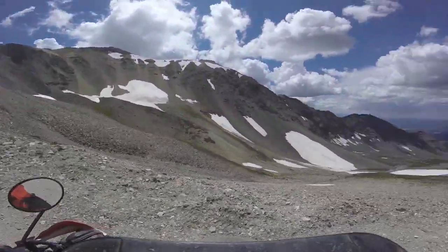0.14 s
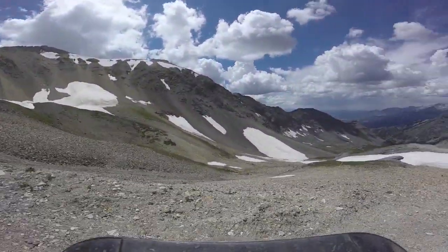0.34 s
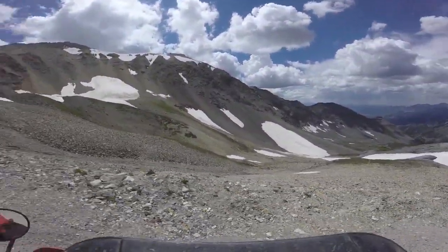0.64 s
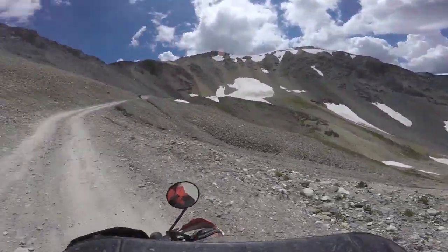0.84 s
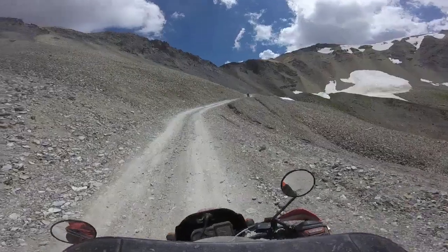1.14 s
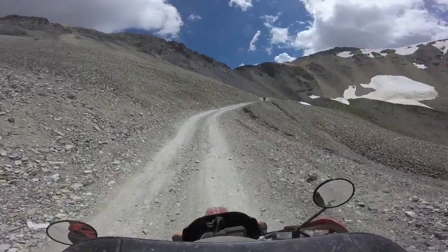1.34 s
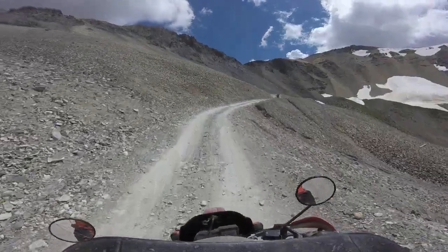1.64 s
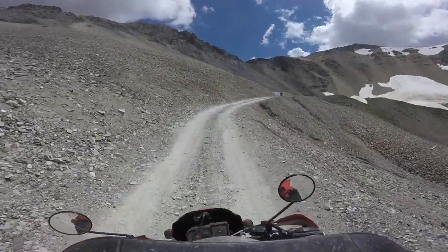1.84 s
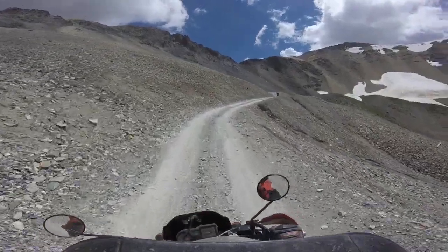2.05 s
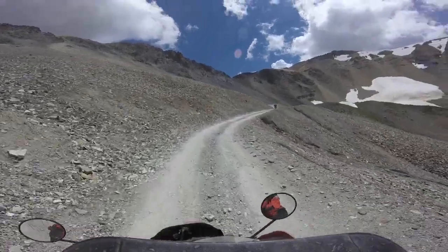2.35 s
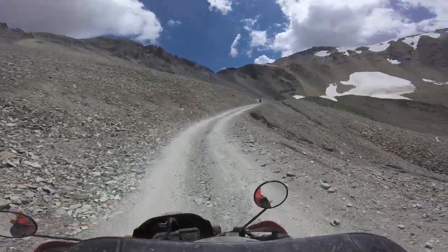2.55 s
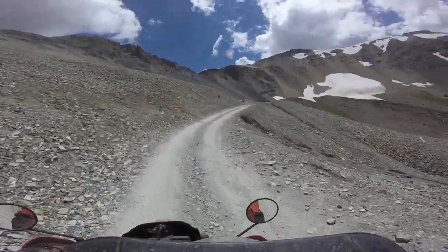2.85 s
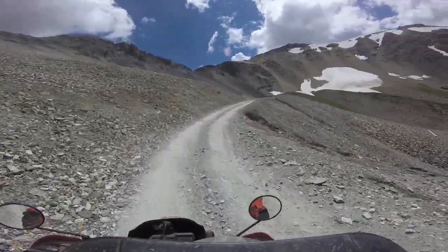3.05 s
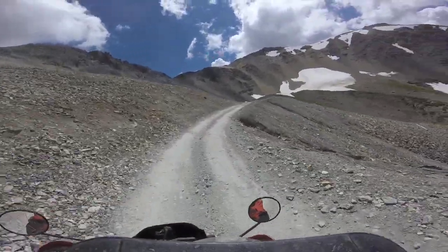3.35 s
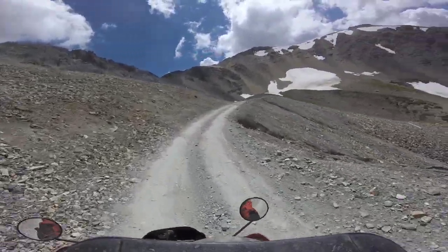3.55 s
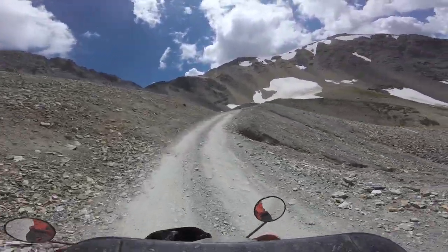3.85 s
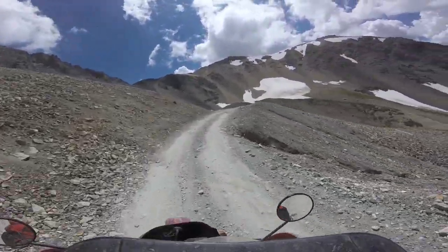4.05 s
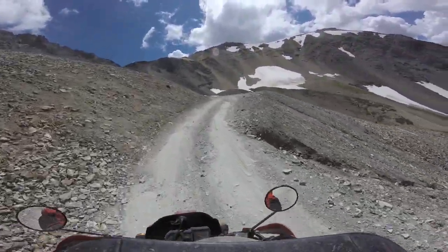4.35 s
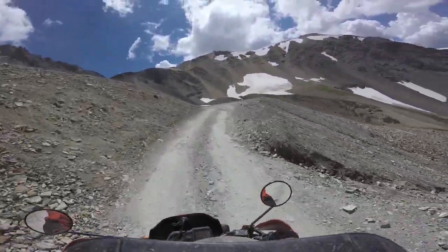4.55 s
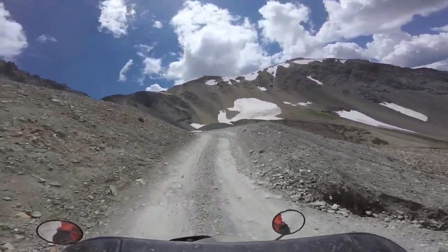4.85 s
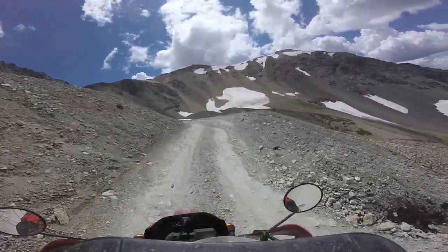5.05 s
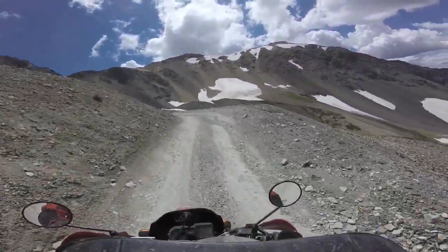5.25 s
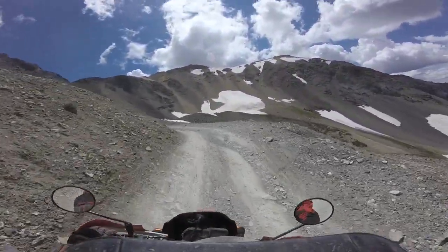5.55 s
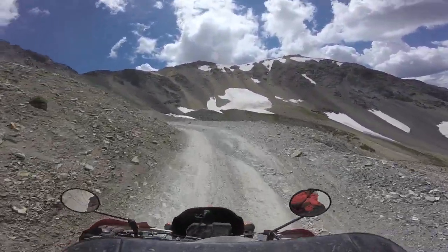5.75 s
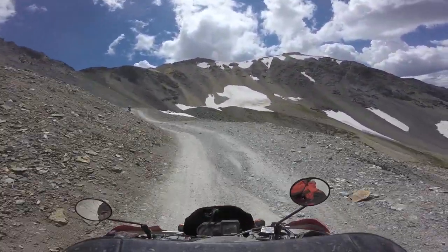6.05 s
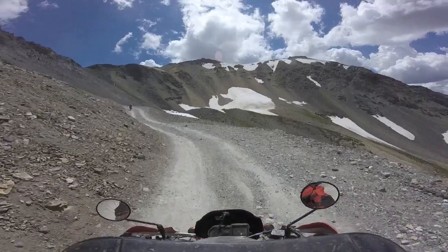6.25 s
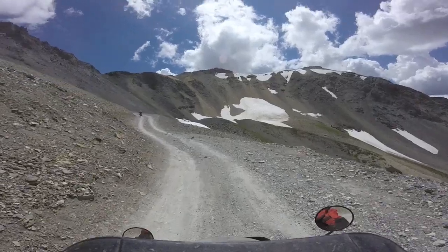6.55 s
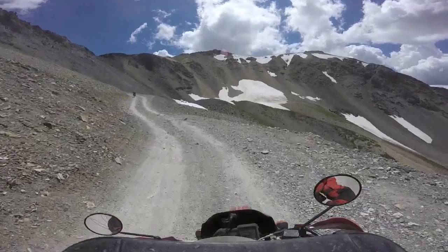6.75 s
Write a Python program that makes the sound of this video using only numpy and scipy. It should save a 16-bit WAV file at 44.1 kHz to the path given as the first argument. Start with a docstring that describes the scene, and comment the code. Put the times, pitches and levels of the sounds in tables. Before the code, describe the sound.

Wind rumbles over a thumping motorcycle engine on a gravel track; stones tick off the bike before the throttle shuts.

```python
"""A single-cylinder motorcycle climbs a gravel mountain track, heard from the rider's helmet. Stones clack at
once; each firing thumps the exhaust pipe, sets it barking and ends in a rasp of gas. Tyres crunch and wind
buffets the microphone throughout. The head, at first turned aside, faces ahead by 1 s. A stone ticks at 1.6 s.
The engine pulls hardest at 2.6 s; from 3.7 s stones tick, clack and skitter against the bike. Near 6 s the
throttle shuts and the tyres slide through loose gravel, up to a last clack."""
import sys
import numpy as np
from scipy import signal
from scipy.fft import rfft, irfft
from scipy.io import wavfile
from scipy.ndimage import uniform_filter1d

SR = 44100
rng = np.random.default_rng(int(sys.argv[2]) if len(sys.argv) > 2 else 0)


def dump(signal):
    """Clip the signal to [-1, 1] and save it as 16-bit WAV at the path in sys.argv[1]."""
    limited = np.clip(np.atleast_2d(signal).T, -1, 1)
    pcm = np.round(limited * 32767).astype(np.int16)
    wavfile.write(sys.argv[1], SR, pcm)


N = 304290
TIME = np.arange(N) / SR

# engine speed: t/s, firing rate/Hz
FIRING_RATE = [(0.0, 30.17), (0.24, 28.77), (0.92, 28.86), (1.09, 30.77), (1.23, 28.98), (1.45, 31.36),
               (1.55, 28.31), (1.69, 31.11), (1.79, 29.86), (2.37, 31.72), (2.45, 34.0), (2.67, 32.27),
               (2.94, 33.08), (2.99, 30.78), (3.07, 32.44), (3.74, 31.03), (3.87, 32.84), (3.98, 29.84),
               (4.13, 32.6), (4.24, 29.3), (5.1, 31.26), (5.28, 28.91), (5.59, 30.77), (5.65, 29.08),
               (6.08, 28.87), (6.9, 24.18)]
# head position: t/s, turn (0 ahead, 1 aside)
HEAD_TURN = [(0, 0.6), (.15, 1), (.8, 1), (1.02, 0)]
# patches of loose gravel: t/s, level/dB, width/s
LOOSE_PATCHES = [(.46, -60, 0.045), (1.03, -44, 0.083), (1.75, -46, 0.33), (2.29, -54, 0.082),
                 (3.17, -42, 0.9), (3.9, -45.5, 0.33), (4.3, -46, 0.45), (4.72, -48, .2),
                 (5.15, -42.5, 0.19), (5.82, -44.5, 0.44), (6.32, -46, 0.22), (6.485, -36.5, 0.055),
                 (6.54, -37.5, 0.13), (6.71, -42, 0.035)]
FIRM_GROUND_DB = -52.5


def engine_cycles(first_firing_cycles=0.318):
    """Running cycle count; the cylinder fires at each whole number."""
    return np.cumsum(curve(FIRING_RATE)) / SR - first_firing_cycles


def firings():
    """Firing times, and time since the last firing at every sample."""
    cycles = engine_cycles()
    times_s = TIME[1:][np.diff(np.floor(cycles)) > 0]
    age_s = cycles % 1 / curve(FIRING_RATE)
    return times_s, age_s


def load_gain(share):
    """Gain of an engine part that follows the given share of the load in dB."""
    # how hard the engine pulls: t/s, load/dB
    load = [(0, -4), (.2, -2.5), (1.14, 1), (1.3, 3.5), (1.48, -1.5), (1.62, 4.5), (1.81, 2), (1.97, 6),
            (2.6, 7), (2.86, 3), (3.66, 2), (3.84, -3), (4.3, -1), (4.54, -1), (4.74, 3), (5.19, -5.5),
            (5.36, 0), (5.95, -1), (6.36, -13), (6.75, -24)]
    # a firing that barely catches: t/s, drop/dB, width/s
    weak_firing = [(4.208, 7, 0.083)]
    return amp(share * (curve(load) - swells(weak_firing)))


def pipe_thump(times_s, level_db=-37, uneven_db=0.5, lowpass_hz=1100):
    """Each pressure pulse rings the pipe's low modes, nearly alike every time."""
    # drifting centre of the main boom: t/s, f/Hz
    boom_centre = [(0, 266.6), (1.1, 265), (1.8, 250), (2.35, 253), (2.6, 265), (3.3, 269), (3.7, 270),
                   (4.05, 289), (4.4, 259), (4.8, 268), (5.1, 286), (5.55, 262), (6.3, 255.4)]
    # the boom's close mode pair: f/centre, level/dB, t60/s
    boom_modes = [(.99, 3, 0.11), (1.08, 0, 0.082)]
    # other low pipe modes: f/Hz, level/dB, t60/s
    pipe_modes = [(155.7, -1.5, 0.077), (442, 2, 0.039), (585, -11, 0.06), (779, -5, 0.04),
                  (1070, 8, 0.0058)]
    pipe, steady = np.zeros(N), ring(pipe_modes, np.cos)
    for start_s in times_s:
        centre_hz = np.interp(start_s, *np.transpose(boom_centre))
        boom = ring([(ratio * centre_hz, db, t60_s) for ratio, db, t60_s in boom_modes], np.cos)
        add(pipe, start_s, -amp(uneven_db * rng.standard_normal()) * (steady + boom))
    pipe = signal.lfilter(*signal.butter(2, lowpass_hz, fs=SR), pipe)
    return unit(pipe) * amp(level_db) * load_gain(0.36)


def silencer_bark(times_s, level_db=-32.5, detune=0.01, sag=0.12, settle_s=0.0022):
    """The silencer's ring swells, slides up to pitch and echoes once down the pipe; each bang differs."""
    # silencer modes: f/Hz, level/dB, rise/s
    silencer_modes = [(1346, 5, 0.002), (1597, -9.5, 0.0035), (1957, -9, 0.0016), (2344, -24, 0.0016),
                      (2745, -30, 0.0039)]
    delay_s, round_trip_s, echo_gain = 0.00065, 0.0059, 0.15
    t, out = np.arange(1300) / SR, np.zeros(N)
    slid_s = t - sag * settle_s * (1 - np.exp(-t / settle_s))
    for k, (hz, db, rise_s) in enumerate(silencer_modes):
        uneven_db = 2.5 if k else 0.9
        envelope = t / rise_s * np.exp(-t / rise_s)
        scatter = np.sqrt(3) * rng.uniform(-1, 1, (len(times_s), 2))  # rms 1
        for start_s, (size, pitch) in zip(times_s, scatter):
            tone = np.sin(2 * np.pi * hz * (1 + detune * pitch) * slid_s)
            bang = amp(db + size * uneven_db) * envelope * tone
            add(out, start_s + delay_s, bang)
            add(out, start_s + delay_s + round_trip_s, echo_gain * bang)
    return unit(out) * amp(level_db) * load_gain(0.9)


def gas_rasp(age_s, ahead_db=-38.5, aside_db=-34.5, spit_db=-59, spit_aside_boost_db=7):
    """Turbulent gas follows each pulse with a bright spit; its colour shifts as the head turns."""
    # rasp spectrum, head ahead: f/Hz, level/dB
    ahead_spectrum = [(200, -28.5), (700, -13.5), (1000, -10.5), (1350, 9.5), (1470, -7.5), (1900, 3),
                      (2080, -1), (2350, 4), (2600, -13), (3000, -7), (3350, -22.5), (3900, -15.5),
                      (5100, -45.5), (6200, -22), (7200, -29), (9000, -40), (14000, -58)]
    # rasp spectrum, head aside: f/Hz, level/dB
    aside_spectrum = [(600, -37), (1000, -3), (1200, -0.5), (1400, -6), (1550, 5.5), (1740, -6),
                      (1900, 2.5), (2080, -6.5), (2350, -7), (2660, -23), (2950, -7.5), (3300, -17),
                      (3900, -16.5), (4500, -25.5), (5200, -31), (6100, -22.5), (7200, -35), (14000, -64)]
    # spit spectrum: f/Hz, level/dB
    spit_spectrum = [(1000, 0), (2300, 5), (3000, -1.5), (3900, -15), (4700, 5), (5200, -3), (6100, 6.5),
                     (7000, -9.5), (9000, -12.5), (12500, -37), (14000, -49)]
    turn = curve(HEAD_TURN)
    gas = rng.choice([-1, 1], N) * puff(age_s, delay_s=0.0009, rise_s=0.00059, fall_s=0.0051)
    ahead = (1 - turn) * amp(ahead_db) * colour(gas, ahead_spectrum)
    aside = turn * amp(aside_db) * colour(gas, aside_spectrum)
    spit = rng.standard_normal(N) * puff(age_s, delay_s=0.00075, rise_s=0.0016, fall_s=0.0042)
    spit = colour(spit, spit_spectrum) * amp(spit_db + spit_aside_boost_db * turn)
    return (ahead + aside) * load_gain(0.73) + spit * load_gain(0.76)


def machinery(age_s, clatter_db=-37.5, shaken_db=-3, sizzle_db=-56.5, throb=2.4):
    """Engine clatter grows on loose ground; valve gear and chain sizzle in step with the cycle."""
    # engine clatter: f/Hz, level/dB
    clatter_spectrum = [(120, -2.5), (260, -4.5), (400, -5), (700, -16.5), (1000, -9), (1350, 5),
                        (1470, -0.5), (1950, -3), (2350, -7), (2700, -10), (4000, -25.5), (15000, -73)]
    # valve gear and chain: f/Hz, level/dB
    sizzle_spectrum = [(2000, -4.5), (4500, 2), (5200, -0.5), (5700, 4), (6400, 5), (7100, -6), (8000, -1),
                       (9200, -7), (10200, -13.5), (12300, -17.5), (13200, -24), (15000, -39)]
    clatter = colour(rng.standard_normal(N) * flicker(rate_hz=230, depth_db=2), clatter_spectrum)
    shaking = amp(shaken_db) * surges(LOOSE_PATCHES, FIRM_GROUND_DB)
    clatter *= np.hypot(amp(clatter_db) * load_gain(0.14), shaking)
    beat = 1 + throb * puff(age_s, delay_s=0.0081, rise_s=0.0014, fall_s=0.0051)
    sizzle = colour(rng.standard_normal(N) * beat * flicker(rate_hz=400, depth_db=0.65), sizzle_spectrum)
    return clatter + sizzle * amp(sizzle_db) * load_gain(0.28)


def engine_drone():
    """The bike vibrates at a few clean multiples of the firing rate."""
    # engine orders: f/firing rate, level/dB
    orders = [(4, 1), (5, -9.5), (8, 5), (9, -14)]
    # drone strength: t/s, level/dB
    drone_level = [(0, -43), (.9, -45), (2.0, -47), (2.95, -43.5), (3.25, -50.5), (3.8, -52), (4.6, -45.5),
                   (5.3, -47.5), (5.7, -45.5), (6.25, -43.5), (6.45, -65), (6.9, -50)]
    cycles = engine_cycles()
    tones = sum(-amp(db) * np.cos(2 * np.pi * order * cycles) for order, db in orders)
    return unit(tones) * amp(curve(drone_level))


def tyre_crunch(grains_per_s=5000, spread_db=3):
    """Many small stones crack under the tyres, in clumps, louder in each loose patch."""
    # cracking gravel: f/Hz, level/dB
    gravel_spectrum = [(500, -32), (1500, -1), (2400, 1.5), (3100, 2.5), (3800, -3), (4300, -27.5),
                       (5300, -28), (6300, -9.5), (7500, -33.5), (14000, -65)]
    sizes = amp(spread_db * np.minimum(rng.exponential(1, N), 4)) * rng.choice([-1, 1], N)
    grains = sizes * (rng.random(N) < grains_per_s / SR)
    crunch = colour(grains * flicker(rate_hz=51, depth_db=2), gravel_spectrum)
    return crunch * surges(LOOSE_PATCHES, FIRM_GROUND_DB)


def stone_strikes(hits, modes, scrape, lowpass_hz=12500):
    """Each stone drives the part it hits with a sharp blow and a short, duller scrape."""
    t, out, body = np.arange(1500) / SR, np.zeros(N), ring(modes, np.sin)
    for start_s, db, contact_s in hits:
        force = scrape * uniform_filter1d(rng.standard_normal(len(t)), size=3) * np.exp(-t / contact_s)
        force[0] += 1  # the blow
        strike = signal.fftconvolve(force, body)
        attack_rms = strike[:SR // 100].std()
        add(out, start_s, amp(db) * strike / attack_rms)
    return signal.lfilter(*signal.butter(6, lowpass_hz, fs=SR), out)


def flying_stones():
    """Small stones tick on the bike, hard hits clack, others skitter along a panel."""
    # stone hits: t/s, level/dB, contact/s
    ticks = [(1.6493, -26.5, 0.001), (3.6951, -30, .0012), (4.111, -45, 0.00088), (4.3736, -35.5, 0.0012),
             (5.5738, -31.5, 0.0015)]
    clacks = [(.0035, -19, 0.0014), (.0072, -18, 0.0017), (4.1472, -21.5, 0.0031), (6.8685, -28.5, 0.00045)]
    skitters = [(3.7445, -30, 0.0094), (4.4249, -30, 0.0034), (5.455, -42, 0.0022), (5.6102, -27.5, 0.0065)]
    # modes of the struck parts: f/Hz, level/dB, t60/s
    tick_modes = [(480, -4.5, 0.083), (1530, 3.5, 0.067), (3700, -10, 0.0057), (4220, 7.5, 0.0034),
                  (5890, 3.5, 0.011), (8040, -17, 0.01), (11100, -19, .005), (12200, -21, .005)]
    clack_modes = [(1470, 8, 0.039), (1750, 15, 0.012), (2256, 22, 0.04), (2796, 19, 0.023),
                   (3670, 11.5, 0.02), (4650, 6, 0.023), (5070, -5, 0.017), (6100, 6, 0.017),
                   (7120, 2.5, 0.026)]
    panel_modes = [(2250, 3.5, 0.051), (2854, 9, 0.019), (3560, 4, 0.0088), (4200, 12, 0.0044),
                   (4430, -12.5, 0.0096), (6840, -23, .004), (11900, -11, .004)]
    return (stone_strikes(ticks, tick_modes, scrape=0.07)
            + stone_strikes(clacks, clack_modes, scrape=0.18)
            + stone_strikes(skitters, panel_modes, scrape=0.44))


def wind(gain_db=-2.5):
    """Air buffets the microphone: an even low rumble with gusts on top, and low thuds as the bike hits bumps."""
    # wind rumble: f/Hz, level/dB
    wind_spectrum = [(10, -13.5), (22, -11), (30, -12.5), (40, -13.5), (51, 2.5), (62, -4), (76, 1.5),
                     (100, -20), (140, -21.5), (200, -24), (400, -37), (1500, -74), (6000, -110)]
    # gusts, and low thuds as the bike hits bumps (near 0.26, 0.81 and 6.53 s): t/s, relative level/dB, width/s
    gusts_and_thuds = [(.1, -29, 0.056), (.26, -26, 0.13), (.81, -24, 0.12), (1.0, -29, 0.047), (1.6, -32, 0.15),
                       (1.95, -28.5, 0.074), (2.34, -30.5, 0.21), (2.63, -27.5, 0.25), (3.0, -27.5, 0.24),
                       (3.185, -20.5, 0.026), (3.34, -27.5, 0.16), (3.77, -28.5, 0.064), (3.99, -30.5, 0.23),
                       (4.75, -35.5, 0.24), (5.1, -30.5, 0.065), (6.32, -30, .06), (6.53, -26, 0.17),
                       (6.78, -29, 0.034)]
    rumble = colour(rng.standard_normal(N), wind_spectrum, size=32768)
    running_rms = np.sqrt(abs(uniform_filter1d(rumble ** 2, size=3000)) + 1e-6)
    return unit(rumble / running_rms) * surges(gusts_and_thuds, base_db=-39) * amp(gain_db)


def amp(db):
    """Decibels to gain."""
    return 10 ** (np.asarray(db) / 20)


def unit(x):
    """Scales to rms 1."""
    return x / np.sqrt(np.mean(x ** 2) + 1e-20)


def curve(rows):
    """A timed table, read at every sample."""
    return np.interp(TIME, *np.transpose(rows))


def add(mix, start_s, sound):
    """Mixes a sound in at start_s."""
    part = mix[max(round(start_s * SR), 0):][:len(sound)]
    part += sound[:len(part)]


def colour(x, spectrum, size=8192):
    """Minimum-phase filter, so attacks stay sharp; output rms 1."""
    hz, db = np.transpose(spectrum)
    bins_hz = abs(np.fft.fftfreq(size, 1 / SR))
    log_gain = np.log(amp(np.interp(np.log(bins_hz + 1), np.log(hz), db)))
    response = np.fft.ifft(np.exp(np.conj(signal.hilbert(log_gain)))).real[:size // 2]
    return unit(signal.oaconvolve(x, response)[:N])


def flicker(rate_hz, depth_db):
    """Smooth random gain; depth_db is its rms swing."""
    hz = np.fft.rfftfreq(N, 1 / SR)
    wander = irfft(rfft(rng.standard_normal(N)) / (1 + (hz / rate_hz) ** 4), N)
    return amp(depth_db * unit(wander))


def ring(modes, wave):
    """Decaying modes of a struck body."""
    t = np.arange(4000) / SR
    return sum(amp(db - 60 * t / t60_s) * wave(2 * np.pi * hz * t) for hz, db, t60_s in modes)


def puff(age_s, delay_s, rise_s, fall_s):
    """Envelope that opens after each firing and dies away."""
    t = np.maximum(age_s - delay_s, 0)
    return (1 - np.exp(-t / rise_s)) * np.exp(-t / fall_s)


def swells(rows):
    """Sum of bell curves: t/s, height, width at half height/s."""
    return sum(height * 0.5 ** ((2 * (TIME - at_s) / width_s) ** 2) for at_s, height, width_s in rows)


def surges(rows, base_db):
    """Gain of a steady bed with swells on top."""
    return np.hypot(amp(base_db), swells([(at_s, amp(db), width_s) for at_s, db, width_s in rows]))


def scene(bark_shade_db=-6, machinery_shade_db=-1.5):
    """Engine, track and wind in open air; the turned head shades part of the engine."""
    times_s, age_s = firings()
    turn = curve(HEAD_TURN)
    exhaust = pipe_thump(times_s) + gas_rasp(age_s) + silencer_bark(times_s) * amp(bark_shade_db * turn)
    engine = exhaust + machinery(age_s) * amp(machinery_shade_db * turn) + engine_drone()
    return (engine + flying_stones() + tyre_crunch() + wind())[None]


def record(dry):
    """Steep low-pass band limit."""
    cutoff_hz = 15200
    lowpass = signal.firwin(511, cutoff_hz, window=("kaiser", 9), fs=SR)
    return signal.oaconvolve(dry, lowpass[None], "same")


dry = scene()
out = record(dry)
dump(out)
```